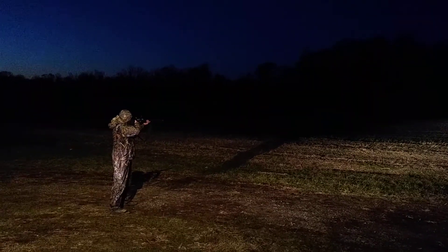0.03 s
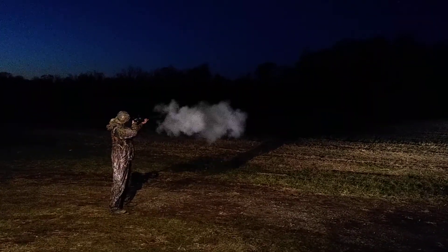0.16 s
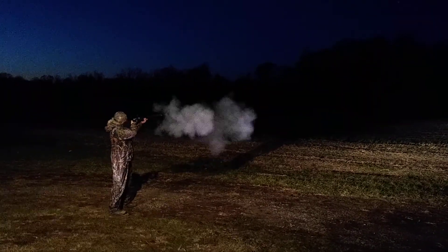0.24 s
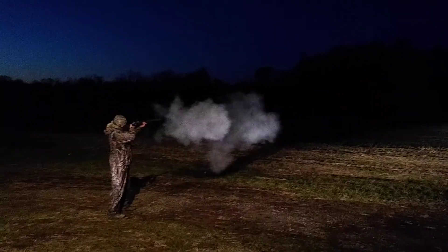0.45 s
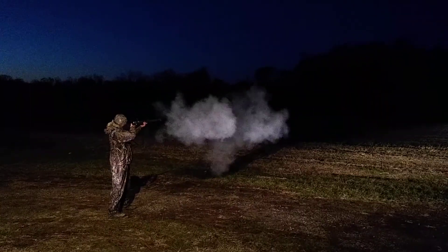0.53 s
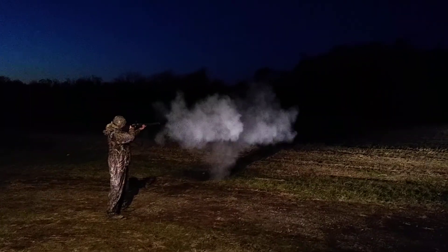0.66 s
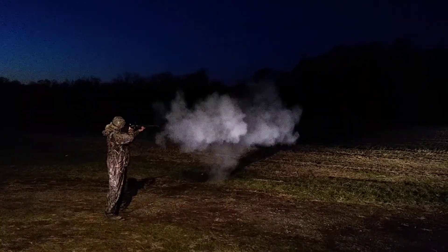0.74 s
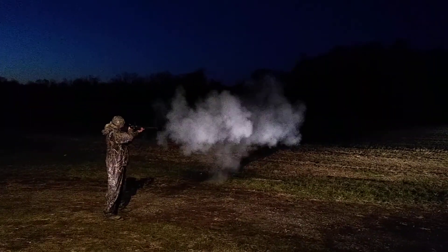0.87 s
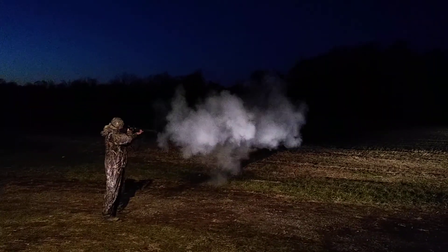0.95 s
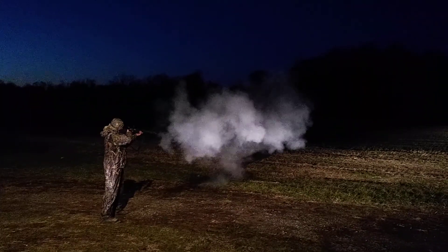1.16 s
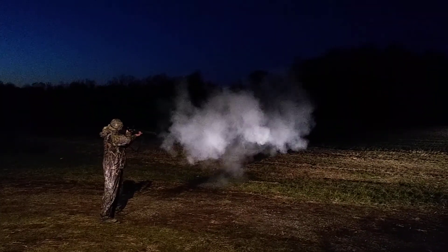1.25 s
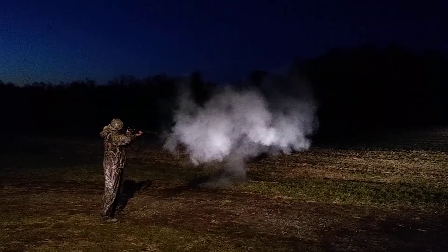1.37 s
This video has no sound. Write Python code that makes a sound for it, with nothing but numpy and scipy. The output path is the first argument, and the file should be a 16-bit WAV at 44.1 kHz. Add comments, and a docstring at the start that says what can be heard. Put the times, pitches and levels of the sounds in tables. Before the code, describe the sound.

One loud, close rifle shot outdoors, just after a tiny trigger click. The blast cracks and thumps, dies away over the field with a few faint echo slaps, then returns from the far woods as a quieter swelling rumble.

```python
"""A muzzleloader is fired once at the edge of a field at night, a few metres from a microphone pair.
Over a faint low rumble, the trigger clicks and the percussion cap snaps. Gas fizzes from the barrel,
then the charge goes off with shock fronts, a crack, a short roar and a low thump.
The field scatters the blast, the nearer woods add a thin wash, and single echoes come back.
Last, the far tree line returns a swelling, grainy roll."""
import sys
import numpy as np
from scipy import signal
from scipy.fft import rfft, irfft
from scipy.io import wavfile

SR = 44100
rng = np.random.default_rng(int(sys.argv[2]) if len(sys.argv) > 2 else 0)


def transcribe(u):
    """Save the signal u as a 16-bit wav file named by the first command-line argument.

    u: samples, shape (n,) or (channels, n), limited to [-1, 1]; the rate is SR.
    q: integer samples, one column per channel.
    """
    v = np.clip(np.atleast_2d(u).T, -1, 1)
    q = np.round(v * 32767).astype(np.int16)
    wavfile.write(sys.argv[1], SR, q)


N = 61739

FIRE_S, GAS_RISE_S = .2368, .001
WIDENER_DELAY_S = .000444  # delay of the inverted crossfeed that widens the stereo image
# Sound from the field at the two ports: frequency_hz, coherence, left_lead_rad, left_minus_right_db
FIELD_PORTS = [(90, .9, -0.5, 6.5), (200, 0.53, -0.9, 1.5), (500, 0.59, -1, -1.5), (800, .88, 1.04, 0.5),
               (1150, 1, -0.5, 1.5)]


def amp(db):
    """Amplitude grows tenfold with every 20 decibels."""
    return 10 ** (np.asarray(db) / 20)


def clock():
    """Time of every sample, in seconds."""
    return np.arange(N) / SR


def since(start_s):
    """Time since an onset, zero before it."""
    return np.maximum(clock() - start_s, 0)


def bins():
    """Frequency of every spectral bin, in hertz."""
    return np.fft.rfftfreq(N, 1 / SR)


def per_bin(table, column=1):
    """A table column interpolated over log frequency."""
    table = np.array(table)
    return np.interp(np.log(bins() + 1), np.log(table[:, 0] + 1), table[:, column])


def envelope(levels):
    """Amplitude along a curve of time_s, level_db."""
    return amp(np.interp(clock(), *np.transpose(levels)))


def pan(right_db):
    """A level difference, shared equally between left and right."""
    return amp(np.array([[-.5], [.5]]) * right_db)


def noise():
    """Two uncorrelated white noises."""
    return rng.standard_normal((2, N))


def scatter(per_s, spread_db):
    """Shot noise: impulses of uneven size arrive at random times."""
    arrivals = noise() * (rng.random((2, N)) < per_s / SR)
    return arrivals * amp(spread_db * np.minimum(rng.exponential(1, (2, N)), 3))


def at_ports(source, gain, ports, left_first=.3):
    """Partial coherence: two unrelated signals are coloured and blended into a stereo pair of rms 1."""
    # The stereo widener's inverted, delayed crossfeed, used above the ports table: frequency_hz, share
    crossfeed = [(1200, .92), (3500, 1), (7000, .7), (14000, .45)]
    common, separate = rfft(source)
    delay_rad = 2 * np.pi * bins() * WIDENER_DELAY_S
    comb = -per_bin(crossfeed) * (np.cos(delay_rad) + 1j * left_first * np.sin(delay_rad))
    tabled = per_bin(ports) * np.exp(1j * per_bin(ports, column=2))
    coherence = np.where(bins() < ports[-1][0], tabled, comb)
    right = coherence.conj() * common + np.sqrt(np.maximum(1 - abs(coherence) ** 2, 0)) * separate
    pair = irfft(np.array([common, right]) * gain * pan(-per_bin(ports, column=3)), N)
    return pair / np.sqrt(np.mean(pair ** 2) + 1e-20)


def night():
    """Background noise: a low rumble, weaker after the shot, over steady microphone hiss."""
    # Rumble spectrum: frequency_hz, relative_db
    spectrum = [(25, -27.5), (60, -7.5), (105, 0.5), (140, -3), (250, -16), (500, -28), (1000, -34.5),
                (2200, -43), (3300, -43.5), (7000, -58), (16000, -63.5)]
    # Background at the ports: frequency_hz, coherence, left_lead_rad, left_minus_right_db
    ports = [(111, 0.92, -3, 1.5), (202, 1, -2.5, 1.5), (399, 1, -1.5, -4.5), (1100, 0.49, -0.4, 0.5)]
    drop_db, drop_s, hiss_corner_hz = 14.5, .05, 9020
    level_db = -46.5 - drop_db * np.minimum(since(FIRE_S) / drop_s, 1)
    rumble = amp(level_db) * at_ports(noise(), amp(per_bin(spectrum)), ports)
    hiss = amp(-87) * at_ports(noise(), 1 / np.hypot(1, bins() / hiss_corner_hz), ports)
    return rumble + hiss


def trigger():
    """A damped transient: the trigger lets the hammer go with a faint click."""
    # Click spectrum: frequency_hz, relative_db
    spectrum = [(60, -6), (130, 16), (300, 0), (700, -3), (1400, 1), (3300, 2), (6000, -16), (9000, -32),
                (16000, -40)]
    t, decay_s = since(start_s=.1322), .0028
    click = at_ports(noise(), amp(per_bin(spectrum)), FIELD_PORTS)
    return amp(-51.5) * (t > 0) * np.exp(-t / decay_s) * click


def cap():
    """Damped modes: the percussion cap snaps on the left.
    Stereo widening adds a weaker, delayed, inverted copy on the right."""
    # Modes of the snap: pitch_hz, level_db, decay_s
    modes = [(3690, -21, 0.00038), (1450, -40.5, 0.00043)]
    start_s, right_db = .2138, -6
    t = np.array([since(start_s), since(start_s + WIDENER_DELAY_S)])
    snap = sum(amp(db) * np.sin(2 * np.pi * hz * t) * np.exp(-t / decay_s) for hz, db, decay_s in modes)
    return snap * np.array([[-1], [amp(right_db)]])


def muzzle_gas():
    """Jet noise: escaping gas fizzes, cracks and roars for a few hundredths of a second."""
    # Spectrum of the fizz and crack: frequency_hz, relative_db
    crack_spectrum = [(500, -19), (1500, -6), (2500, -7.5), (4000, 8), (5800, 6.5), (7500, -20.5),
                      (12000, -2), (16000, -15.5)]
    # Spectrum of the roar: frequency_hz, relative_db
    roar_spectrum = [(35, -47.5), (70, -22), (200, -4), (370, -10), (600, 1.5), (1000, -7), (1600, -4.5),
                     (2200, -13), (3200, -13.5), (4500, -25), (5700, -26.5), (8000, -33.5), (13000, -31.5),
                     (16000, -33)]
    # Direct sound at the ports: frequency_hz, coherence, left_lead_rad, left_minus_right_db
    ports = [(89, 0.89, 0, 8), (200, 1, -4.5, -5), (400, .6, -2.87, 8), (644, .8, -1.0, -4.5),
             (1100, .95, -0.5, 2.5), (1400, .7, 2, 3.5)]
    fizz_s, crack_s, crack_decay_s = .2345, .2394, .0017
    hold_s, release_s, sag_db_per_s = .034, .0058, 120
    t, after_crack = since(FIRE_S), since(crack_s)
    fizz = amp(-21) * np.minimum(since(fizz_s) / (FIRE_S - fizz_s), 1) * (after_crack == 0)
    crack = amp(-8.5) * (after_crack > 0) * np.exp(-after_crack / crack_decay_s)
    roar = np.minimum(t / GAS_RISE_S, 1) * amp(-11 - sag_db_per_s * t)
    roar *= np.exp(-since(FIRE_S + hold_s) / release_s)
    bright = at_ports(noise(), amp(per_bin(crack_spectrum)), ports)
    rough = at_ports(scatter(per_s=5000, spread_db=-1.5), amp(per_bin(roar_spectrum)), ports)
    return (fizz + crack) * bright + roar * rough


def shocks():
    """Friedlander blast waves: each front is a sudden push followed by a longer suction."""
    # Shock fronts and their near reflections: start_s, level_db, push_s, right_lag_s
    fronts = [(0.2364, -6, 0.00013, 0.000061), (0.2389, 1, 0.00015, 0.00042),
              (0.2433, -5.5, 0.00075, 0.00028), (.2511, -10, 0.00065, 0.000073),
              (0.2568, -3.5, 0.00059, .0001), (0.2635, -17, 0.00051, 0.00075)]
    band_hz = [300, 5000]
    pressure = np.zeros((2, N))
    for start_s, level_db, push_s, right_lag_s in fronts:
        age = np.array([since(start_s), since(start_s + right_lag_s)]) / push_s
        pressure += amp(level_db) * (age > 0) * (1 - age) * np.exp(-age)
    return signal.lfilter(*signal.butter(1, band_hz, "band", fs=SR), pressure)


def thump():
    """A low wave packet: a push of air swells and fades, in antiphase at the two ports."""
    peak_s, pitch_hz, decay_s, right_db = .274, 85.5, .014, -3
    t = clock() - peak_s
    onset = np.minimum(since(FIRE_S) / GAS_RISE_S, 1)
    wave = np.cos(2 * np.pi * pitch_hz * t) * np.exp(-abs(t) / decay_s) * onset
    return amp(-15.5) * np.array([wave, -amp(right_db) * wave])


def field():
    """Reverberation: the ground scatters the blast, and each band decays at its own rate."""
    # Spectrum of the scattered blast: frequency_hz, relative_db
    spectrum = [(40, -42), (120, -9.5), (200, -7.5), (400, -6), (700, -3.5), (1100, -6.5), (1600, -6.5),
                (2200, -7.5), (3200, -13), (4500, -20.5), (7000, -29.5), (12000, -42), (16000, -46)]
    # Time each band takes to fall 60 dB: frequency_hz, t60_s
    decay_times = [(80, 0.65), (200, 0.51), (500, 0.65), (1000, 0.75), (2000, .55), (3500, 0.48),
                   (7000, 0.46), (14000, 0.8)]
    t, rise_s = since(FIRE_S), .015
    scattered = rfft(at_ports(scatter(per_s=6000, spread_db=.5), amp(per_bin(spectrum)), FIELD_PORTS))
    centres_hz, t60s = np.transpose(decay_times)
    tail = np.zeros((2, N))
    for weights, t60_s in zip(np.eye(len(centres_hz)), t60s):
        band = irfft(scattered * per_bin(np.c_[centres_hz, weights]), N)
        tail += band * amp(-60 * t / t60_s)
    return amp(-15) * np.minimum(t / rise_s, 1) * tail


def near_woods():
    """Diffuse reflection: the nearer woods keep up a thin, fading wash."""
    # Spectrum of the wash: frequency_hz, relative_db
    spectrum = [(40, -42), (110, -12.5), (200, 4), (400, -9), (700, -14), (1200, -10), (1800, -6),
                (2400, -8.5), (3400, -14.5), (4500, -23), (6000, -41.5), (8000, -47.5), (16000, -66.5)]
    # Fading of the wash: time_s, level_db
    levels = [(.24, -37.5), (.45, -38.5), (.52, -37.5), (.63, -44), (.74, -47), (.86, -45), (.92, -47),
              (.98, -57), (1.4, -58)]
    reflections = scatter(per_s=7000, spread_db=2)
    wash = at_ports(reflections, amp(per_bin(spectrum)), FIELD_PORTS, left_first=.4)
    return (clock() > FIRE_S) * envelope(levels) * wash * pan(right_db=1.5)


def echoes():
    """Discrete reflection: banks of ground and clumps of trunks each return one coloured slap."""
    # Gaussian bursts: peak_s, level_db, width_s, centre_hz, width_octaves, right_minus_left_db
    slaps = [(0.281, -23.5, 0.0086, 163, 0.74, 4.5), (0.342, -26, 0.021, 542, 0.71, 1.5),
             (0.4154, -26, 0.0052, 914, 0.12, -2), (0.419, -36.5, 0.011, 2480, 0.61, 2),
             (0.424, -31, 0.0091, 249, 0.51, -2.5), (0.487, -41, 0.0086, 121, 0.15, -1),
             (0.528, -54.5, 0.09, 3400, 0.51, 4), (0.619, -46, 0.029, 213, 0.23, 4),
             (.904, -40, 0.0081, 1694, 0.16, 7.5), (.905, -43.5, 0.0068, 2920, 0.36, 0),
             (1.027, -44.5, 0.0024, 1400, 0.52, -3), (1.056, -39, .0015, 1400, 0.13, 1),
             (1.098, -34.5, 0.0019, 1300, 0.41, 5.5), (1.153, -31, 0.0044, 1500, 0.42, 4),
             (1.177, -29.5, 0.0021, 756, 0.55, 7), (1.244, -39.5, 0.0024, 800, .8, 11)]
    out = np.zeros((2, N))
    for peak_s, level_db, width_s, centre_hz, width_octaves, right_db in slaps:
        band = np.exp(-.5 * (np.log2((bins() + 1) / centre_hz) / width_octaves) ** 2)
        shape = np.exp(-.5 * ((clock() - peak_s) / width_s) ** 2)
        slap = shape * at_ports(noise(), band, FIELD_PORTS)
        slap *= np.sqrt(np.mean(shape ** 2) / np.mean(slap ** 2))
        out += amp(level_db) * pan(right_db) * slap
    return out


def tree_line():
    """Backscatter over a long path: far trees return a dull, grainy roll that swells late."""
    # Spectrum of the roll: frequency_hz, relative_db
    spectrum = [(40, -37.5), (95, -3), (160, 5), (370, -12.5), (700, 2), (1000, -5), (1500, -0.5),
                (1900, -12.5), (2400, -17.5), (3200, -27.5), (4500, -40.5), (6000, -55.5), (8000, -62),
                (16000, -76.5)]
    # Swell of the roll: time_s, level_db
    levels = [(.93, -50), (1.01, -49), (1.09, -43), (1.155, -34), (1.24, -32.5), (1.32, -32.5), (1.4, -33)]
    # Distant sound at the ports: frequency_hz, coherence, left_lead_rad, left_minus_right_db
    ports = [(90, .85, -1.4, -2), (220, 0.76, -0.68, -3.5), (450, .65, -.9, -9), (700, .8, -.8, -6.5),
             (1020, 1, -.5, 3), (1500, 0.31, 1.1, -3), (1950, 1, -.3, -1.5)]
    reflections = scatter(per_s=4000, spread_db=2.5)
    roll = at_ports(reflections, amp(per_bin(spectrum)), ports, left_first=-.65)
    return (clock() > FIRE_S) * envelope(levels) * roll


def scene():
    """Superposition: the lock, the shot and its reflections add to the night air."""
    direct = trigger() + cap() + muzzle_gas() + shocks() + thump()
    diffuse = field() + near_woods() + tree_line()
    return direct + diffuse + echoes() + night()


def record(dry):
    """Soft saturation: the microphone rounds off the loudest peaks, then a low-pass limits the band."""
    ceiling, edge_hz = 1.05, 16000
    rounded = ceiling * np.tanh(dry / ceiling)
    low_pass = signal.firwin(255, edge_hz, window=("kaiser", 9), fs=SR)
    return signal.oaconvolve(rounded, low_pass[None], "same")


dry = scene()
out = record(dry)
transcribe(out)
```